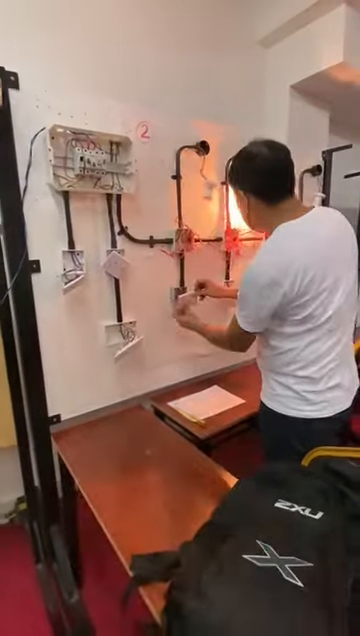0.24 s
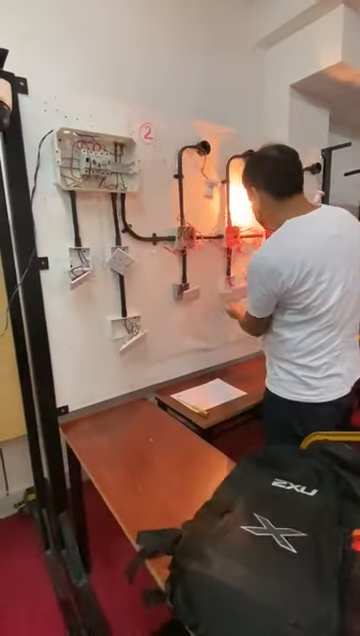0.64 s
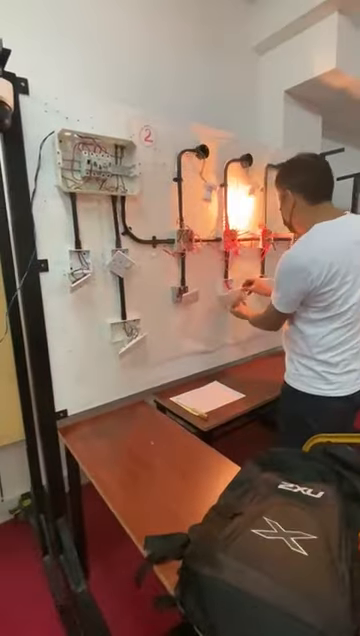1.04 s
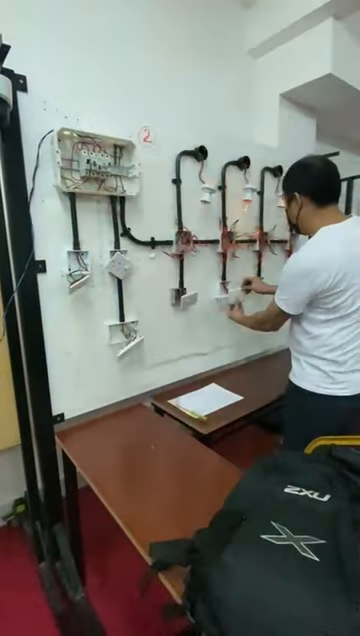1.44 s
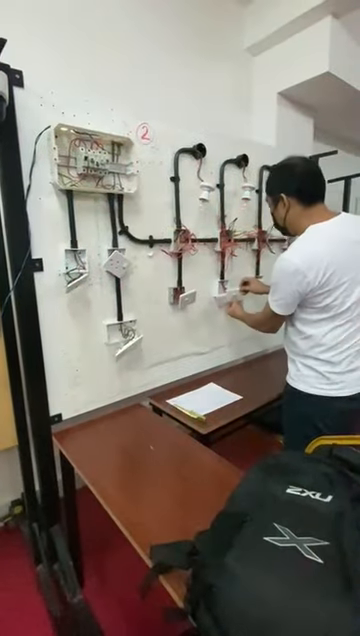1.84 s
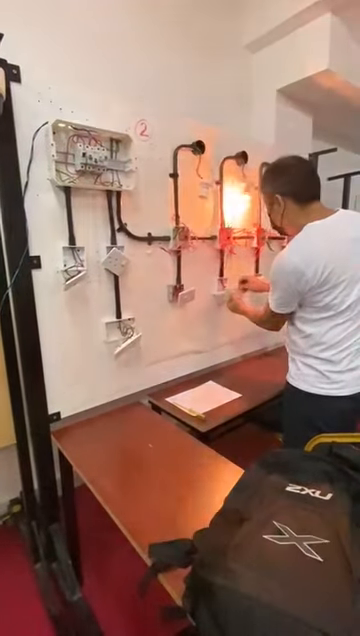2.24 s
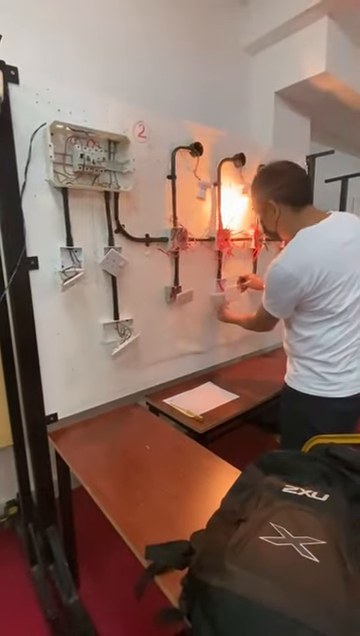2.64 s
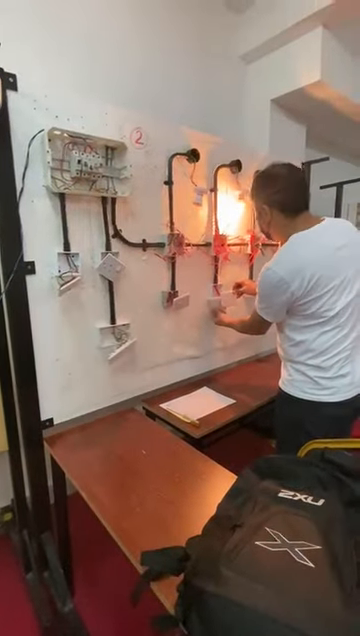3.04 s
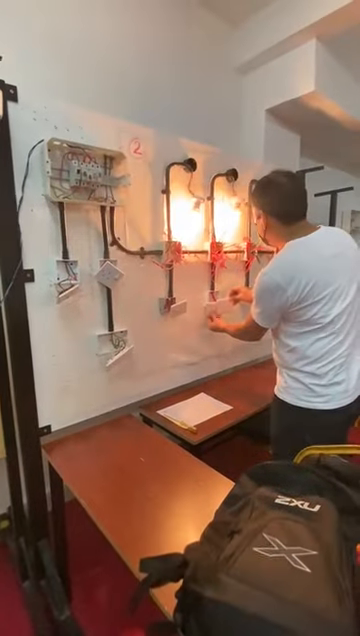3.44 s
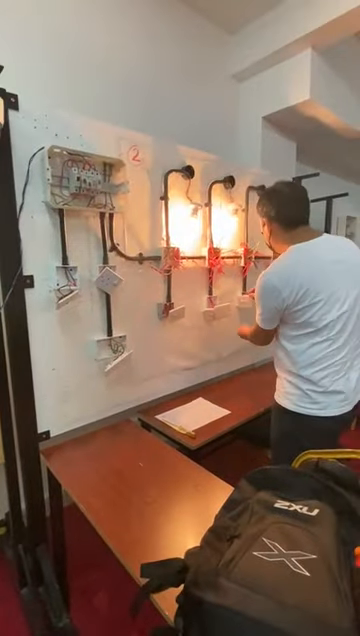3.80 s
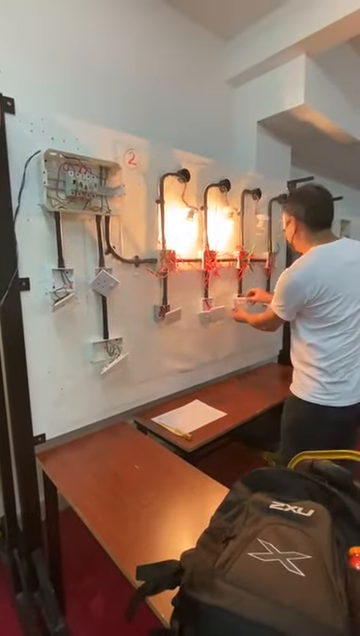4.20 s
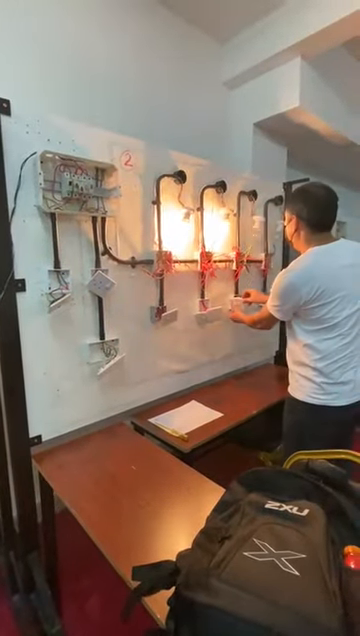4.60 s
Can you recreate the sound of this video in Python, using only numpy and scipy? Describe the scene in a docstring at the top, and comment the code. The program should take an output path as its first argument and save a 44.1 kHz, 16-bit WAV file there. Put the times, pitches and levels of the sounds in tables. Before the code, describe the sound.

A bare, reverberant workshop with a steady low ventilation rumble, slight wavering hum and barely audible high whine. Right at 0 seconds a plastic rocker switch snaps, crisp and bright, a little to the right, its echo fading over almost a second. A dull knock lands at 0.6, a fainter one at 0.7. Around 0.9 a thin, unsteady squeak of about a tenth of a second sags slightly in pitch, with a scuff and tiny finger ticks. A stronger snap comes at 1.3. Near 1.85, ticks mix with a soft footfall and rub; another rub follows at 2.1. The third snap hits at 2.2, then a low bump and soft plate ticks. The fourth, sharp snap is at 3.15, trailed by a small knock. A dull footfall at 3.55, a faint knock and hiss at 3.9, and an airy scuff at 4.2 lead to rumble with one almost inaudible tick at 4.55.

```python
"""A plastic wall switch snaps at once, then three more snaps follow, in a bare, ringing workshop.
Each rocker clatters for a millisecond or two and rings its cover plate, a little to the right.
Between the snaps fingers tick on the plates, a man shifts his feet, and there are dull knocks,
scuffs and a squeak. Plates and floor are sets of resonances struck by short bursts of noise;
scuffs and the low ventilation rumble are filtered noise, and random reflections make the room."""
import sys
import numpy as np
from scipy import signal
from scipy.fft import rfft, irfft
from scipy.io import wavfile
from scipy.ndimage import uniform_filter1d, minimum_filter1d

SR = 44100
rng = np.random.default_rng(int(sys.argv[2]) if len(sys.argv) > 2 else 0)


def pcm_store(signal):
    """Save signal as 16-bit PCM."""
    levels = np.round(np.clip(np.atleast_2d(signal), -1, 1) * 32767)
    wavfile.write(sys.argv[1], SR, levels.astype(np.int16).T)


N = 209817  # length of the scene in samples
TIME = np.arange(N) / SR  # seconds
TAPS = 4096  # length of one struck sound in samples
HZ = np.fft.rfftfreq(TAPS, 1 / SR)  # the frequencies of its spectrum


# Resonances of each switch's cover plate, by switch name.
# Each row: frequency in Hz, width in Hz, level in dB relative to the other resonances.
PLATE_MODES = { "first": [(1401, 940, -8), (2300, 450, -14), (2800, 1100, -0.5), (3680, 770, -6),
               (4500, 750, -1), (5150, 520, -3), (5820, 750, 5), (6720, 520, 6), (7400, 600, -5),
               (9200, 2800, -5), (9900, 1200, -4)], "second": [(1110, 1300, -19), (2375, 560, -7),
               (2946, 590, 4.5), (3300, 170, -9), (4400, 2800, -6.5), (5550, 1400, -2), (6600, 900, -3.5),
               (7770, 700, -4.5), (8940, 850, -4.5), (10330, 330, -12.5)], "third": [(960, 250, -18.5),
               (2480, 1100, -7.5), (3200, 850, -5), (4390, 370, 2), (5314, 430, 5), (6300, 2800, -3),
               (7740, 960, -9), (9000, 700, -6.5), (9750, 1200, -13.5)], }
# The rocker snaps.
# Each row: start in seconds, switch name, energy in dB before the path, clatter length in seconds.
ROCKER_SNAPS = [(0.0001, "first", 1, 0.001), (1.2961, "second", 7, 0.002), (2.2293, "second", 6.5, 0.0024),
                (3.1636, "third", 1, 0.0018)]
# Finger ticks on a plate.
# Each row: start in seconds, switch name, energy in dB before the path, clatter length in seconds.
FINGER_TICKS = [(.8875, "first", -29, 0.0031), (.9349, "second", -27, 0.0031), (.958, "first", -35, 0.0085),
                (1.8296, "second", -21.5, 0.0016), (1.868, "third", -32.5, .012),
                (2.468, "third", -20, .016), (2.7930, "third", -34, 0.0011), (3.0963, "first", -28, 0.0012),
                (4.557, "third", -44, 0.0029)]
# The straight path from the board to the microphones.
# Each row: frequency in Hz, gain to the left in dB, gain to the right in dB.
DIRECT_PATH = [(500, -14, -4), (1800, -8, -6), (2860, -8.5, 10.5), (3760, -7, 4.5), (5860, 0.5, 4),
               (7560, -1.5, 0), (9800, 2.5, -7)]


def switches(rows, top_hz, room_db, body_db, scatter_db, lag_s=.00016, scatter_s=0.0065, scatter_delay_s=.0012):
    """Short clatters ring the plates; returns the near sound and what goes into the room."""
    near, sent = np.zeros((2, N)), np.zeros(N)
    left = amp(read(DIRECT_PATH, HZ, axis=1))
    right = amp(read(DIRECT_PATH, HZ, axis=2))
    # the sound reaches the left microphone slightly later
    path = causal(right) * np.array([left / right * delay(lag_s), np.ones(len(HZ))])
    # the broad knock of the box
    body = amp(body_db) * HZ / (HZ + 500) / (1 + (HZ / 9000) ** 4)
    for start_s, switch, db, length_s in rows:
        colour = contact(top_hz) * np.sqrt(ringing(PLATE_MODES[switch]) + body ** 2)
        snap = amp(db) * evened(causal(colour)) * clatter(length_s)
        # the board, the desk and the man scatter it within a few milliseconds
        scatter = np.array([clatter(scatter_s), clatter(scatter_s)])
        echoes = amp(scatter_db) * delay(scatter_delay_s) * scatter
        add(near, start_s, pulse(snap * (path + echoes)))
        add(sent, start_s, amp(room_db) * pulse(snap))
    return near, sent


# The footfalls. Each row: start in seconds, energy in dB before each contact's own level.
FOOTFALLS = [(1.868, -24.5), (3.537, -16.5)]
# Each footfall is four soft contacts: a dull thud, a brighter slap, a duller one, a low one.
# Each row: delay in seconds, level in dB, top of the contact's range in Hz.
FOOT_CONTACTS = [(0, 1.5, 450), (.022, -1.5, 2200), (.040, -1.5, 1000), (.094, -1.5, 250)]
# Resonances of the floor.
# Each row: frequency in Hz, width in Hz, level in dB relative to the other resonances.
FLOOR_MODES = [(187, 120, 0), (430, 380, -9), (848, 62, -4), (1034, 490, -12.5)]


def steps(length_s=0.0034):
    """Each footfall is four soft contacts that ring the same floor resonances."""
    out = np.zeros(N)
    for start_s, db in FOOTFALLS:
        for after_s, part_db, top_hz in FOOT_CONTACTS:
            colour = contact(top_hz) * np.sqrt(ringing(FLOOR_MODES))
            thud = evened(causal(colour)) * clatter(length_s)
            add(out, start_s + after_s, amp(db + part_db) * pulse(thud))
    return out


# Soft handling knocks.
# Each row: start in seconds, energy in dB before the mix, centre of the resonance in Hz.
HANDLING_KNOCKS = [(0.595, -13, 415), (.699, -25, 430), (2.35, -21.5, 120), (3.266, -24, 880),
                   (3.958, -25, 616)]


def knocks(length_s=0.0045, width_share=0.86):
    """Dull knocks, each one heavily damped resonance as wide as a share of its centre."""
    out = np.zeros(N)
    for start_s, db, centre_hz in HANDLING_KNOCKS:
        colour = causal(hump(HZ, centre_hz, width_share * centre_hz))
        add(out, start_s, amp(db) * pulse(evened(colour) * clatter(length_s)))
    return out


# Scuffs of soles and sleeves.
# Each row: start in seconds, length in seconds, and the peak levels of rub and hiss in dB.
SCUFF_STROKES = [(0.892, 0.077, -57, -67.5), (1.826, 0.097, -55.5, -88), (2.083, 0.24, -54, -76),
                 (3.883, 0.11, -71, -66.5), (4.181, 0.13, -59.5, -57)]
# The low and high band of every scuff. Each holds: centre in Hz, width in Hz.
RUB_BAND = (620, 1900)
HISS_BAND = (5400, 4200)


def scuffs(grain_db=3):
    """Rubbing: many tiny slips under one smooth stroke, heard as a low rub and a hiss."""
    out, hz = np.zeros(N), np.fft.rfftfreq(N, 1 / SR)
    # uneven slip strengths make the noise grainy
    slips = rfft(rng.standard_normal(N) * amp(grain_db * rng.exponential(1, N)))
    rub = evened(irfft(slips * hump(hz, *RUB_BAND), N))
    hiss = evened(irfft(slips * hump(hz, *HISS_BAND), N))
    for start_s, length_s, rub_db, hiss_db in SCUFF_STROKES:
        stroke = np.sin(np.pi * np.clip((TIME - start_s) / length_s, 0, 1)) ** 2
        out += stroke * (amp(rub_db) * rub + amp(hiss_db) * hiss)
    return out


def squeak(start_s=.882, hold_s=0.111, attack_s=0.0097, release_s=0.02, level_db=-63,
           start_hz=1138, sag_hz_per_s=130, jitter=0.014, flutter_db=3):
    """A thin stick-slip tone: it catches, holds unsteadily while its pitch sags, and lets go."""
    t = TIME - start_s
    # slow random curves for the pitch and the level
    waver = evened(uniform_filter1d(rng.standard_normal(N), size=300))
    flutter = evened(uniform_filter1d(rng.standard_normal(N), size=900))
    pitch_hz = (start_hz - sag_hz_per_s * t) * (1 + jitter * waver)
    turns = np.cumsum(pitch_hz) / SR
    envelope = np.clip(t / attack_s, 0, 1) * np.clip(1 - (t - hold_s) / release_s, 0, 1)
    level = np.sqrt(2) * amp(level_db + flutter_db * flutter)
    return level * envelope * np.sin(2 * np.pi * turns)


# How fast the room dies away. Each row: frequency in Hz, time to fall by 60 dB in seconds.
ROOM_DECAY = [(150, 1), (500, 0.7), (1300, 0.91), (3000, 0.91), (5400, 0.86), (7700, 0.75), (11000, 0.2)]


def room(x, level_db, right_db, build_s=0.004, shared_hz=300, rough_db=3):
    """Bare walls: reflections build up, then each band dies at its own speed, with a random roughness."""
    hz, t, z = signal.stft(diffuse(1.3), SR, nperseg=256)
    # long waves reach both microphones alike
    same = np.exp(-(hz[:, None] / shared_hz) ** 2)
    z = np.array([z[0], same * z[0] + np.sqrt(1 - same ** 2) * z[1]])
    # random level changes over frequency and time roughen the tail
    roughness = uniform_filter1d(rng.standard_normal(z[0].shape), size=2, axis=0)
    roughness = evened(uniform_filter1d(roughness, size=16, axis=1))
    z = z * amp(rough_db * roughness)
    z = z * amp(-60 * t / read(ROOM_DECAY, hz)[:, None])
    tail = signal.istft(z * (1 - np.exp(-t / build_s)), SR, nperseg=256)[1]
    tail /= np.linalg.norm(tail, axis=1, keepdims=True)
    echoing = signal.fftconvolve(x[None], tail, axes=1)[:, :N]
    return amp(level_db) * amp([[0], [right_db]]) * echoing


# The colour of the ventilation noise. Each row: frequency in Hz, relative level in dB per Hz.
AIR_COLOUR = [(15, -37.5), (25, -18.5), (49, -2), (102, -4), (166, -6.5), (244, -9.5), (440, -12),
              (520, -19), (720, -20), (1670, -31.5), (2860, -34.5), (6650, -52), (9000, -55),
              (11400, -76.5)]
# Its steady tones. Each row: frequency in Hz, level in dB before wavering.
AIR_TONES = [(48.4, -58), (283, -67.5), (5997, -94), (8995, -95.5)]
# How alike the noise is at both microphones.
# Each row: frequency in Hz, likeness (cut off at -1 and 1; negative means opposite in sign).
AIR_LIKENESS = [(60, 0.9), (170, 1.17), (350, 0.47), (600, -0.53), (1200, -0.5), (8000, -0.17)]
# Its balance. Each row: frequency in Hz, left level minus right level in dB.
AIR_LEAN = [(60, 2.5), (170, 4), (480, 4.5), (1360, 1), (3860, -1), (10900, 2)]


def ventilation(level_db=-50.5, waver=0.84):
    """Low rumble, alike at both microphones in the bass, with a wavering hum and a faint high whine."""
    hz = np.fft.rfftfreq(N, 1 / SR)
    a, b = rfft(rng.standard_normal((2, N)))
    same = np.clip(read(AIR_LIKENESS, hz), -1, 1)
    lean_db = read(AIR_LEAN, hz) / 2
    left = a * amp(lean_db)
    right = (same * a + np.sqrt(1 - same ** 2) * b) * amp(-lean_db)
    pair = np.array([left, right])
    air = amp(level_db) * evened(irfft(pair * amp(read(AIR_COLOUR, hz)), N))
    for tone_hz, db in AIR_TONES:
        # one slow random curve moves both the level and the phase
        drift = evened(irfft(rfft(rng.standard_normal(N)) * np.exp(-hz / 3), N))
        tone = np.sin(2 * np.pi * tone_hz * TIME + drift)
        air += np.sqrt(2) * amp(db) * (1 + waver * drift) * tone
    return air


def amp(db):
    """Decibels to gain."""
    return 10 ** (np.asarray(db) / 20)


def evened(x):
    """Scales to an rms of one."""
    return x / np.sqrt(np.mean(abs(x) ** 2) + 1e-20)


def read(points, hz, axis=1):
    """One column of a table, joined on a log-frequency axis."""
    columns = np.transpose(points)
    return np.interp(np.log(hz + 1), np.log(columns[0] + 1), columns[axis])


def add(mix, s, sound):
    """Mixes a sound in at time s, in seconds."""
    part = mix[..., max(round(s * SR), 0):][..., :sound.shape[-1]]
    part += sound[..., :part.shape[-1]]


def hump(hz, centre_hz, width_hz):
    """Gain of a damped resonance with steep skirts."""
    return 1 / (1 + .5 * ((hz - centre_hz) / width_hz) ** 2) ** 4


def ringing(modes):
    """Power spectrum of a set of resonances."""
    return sum((amp(db) * hump(HZ, hz, width)) ** 2 for hz, width, db in modes)


def contact(top_hz):
    """A soft touch cannot drive the high resonances."""
    return 1 / np.sqrt(1 + (HZ / top_hz) ** 4)


def causal(gain):
    """Gives a gain curve the phase of something struck: it rings only afterwards."""
    log_gain = np.log(np.maximum(gain, 1e-5))
    mirrored = np.r_[log_gain, log_gain[-2:0:-1]]
    return np.exp(np.conj(signal.hilbert(mirrored)))[:len(gain)]


def clatter(length_s, rise=0.35):
    """Spectrum of a brief rattle of contacts, equally strong at all frequencies."""
    u = np.arange(TAPS) / SR / length_s
    window = np.minimum(u / rise, 1) * np.exp(-u ** 2)
    burst = rng.standard_normal(TAPS)
    # shorten the burst and flatten its spectrum in turn
    for _ in range(3):
        flat = np.exp(1j * np.angle(rfft(burst * window)))
        burst = irfft(flat)
    return flat


def delay(seconds):
    """Spectrum of a pure delay."""
    return np.exp(-2j * np.pi * HZ * seconds)


def pulse(spectrum):
    """The short sound that has this spectrum, faded to silence at its end."""
    return irfft(spectrum) * np.minimum(np.linspace(4, 0, TAPS), 1) ** 2


def diffuse(seconds):
    """Sparse reflections of random sign, different at each microphone."""
    shape = (2, round(seconds * SR))
    return rng.choice([-1., 1.], shape) * (rng.random(shape) < .2)


def scene():
    """Switches on the right, feet, knocks and rubbing, all in one room with ventilation."""
    snaps, snaps_sent = switches(ROCKER_SNAPS, top_hz=14000, room_db=5.4, body_db=-29, scatter_db=-5.5)
    ticks, ticks_sent = switches(FINGER_TICKS, top_hz=4400, room_db=6.5, body_db=-4.5, scatter_db=-2.0)
    thuds, rubs = steps() + knocks(), scuffs()
    near = snaps + ticks + thuds * amp([[0], [-2]]) + rubs + squeak()
    far = room(snaps_sent + ticks_sent, level_db=-10.0, right_db=0.5)
    far = far + room(amp(-1.2) * thuds + rubs, level_db=3, right_db=-1)
    return near + far + ventilation()


def record(dry, ceiling=.88, edge_hz=11500):
    """A fast limiter holds back the highest crests; then a steep filter cuts the top treble."""
    allowed = ceiling / np.maximum(abs(dry).max(axis=0), ceiling)
    # spread each dip by about a millisecond and smooth it
    gain = uniform_filter1d(minimum_filter1d(allowed, size=45), size=41)
    low_pass = signal.firwin(255, edge_hz, window=("kaiser", 9), fs=SR)
    return signal.oaconvolve(dry * gain, low_pass[None], "same")


dry = scene()
out = record(dry)
pcm_store(out)
```